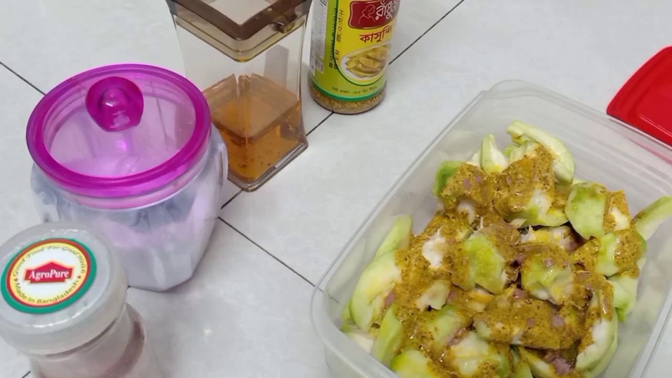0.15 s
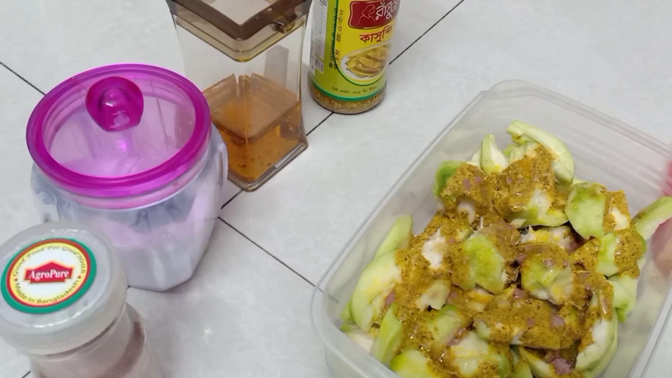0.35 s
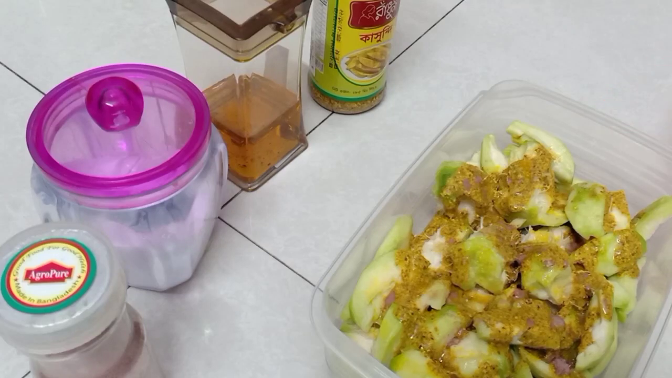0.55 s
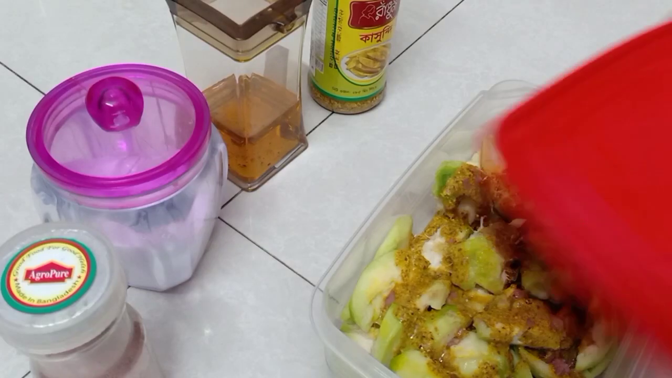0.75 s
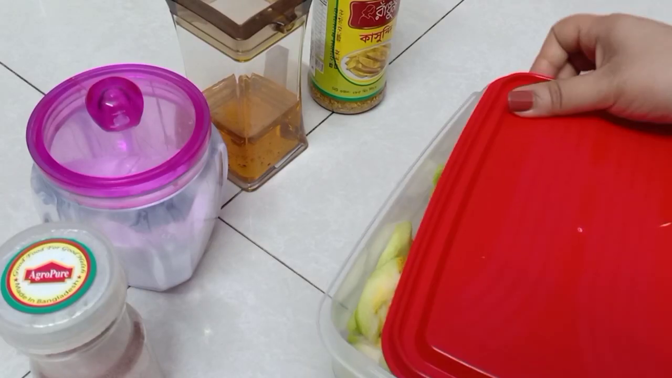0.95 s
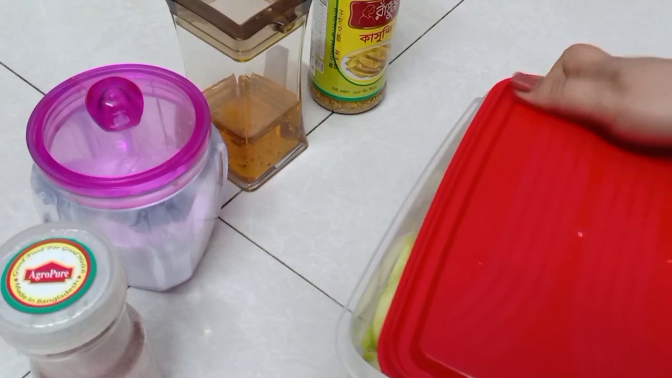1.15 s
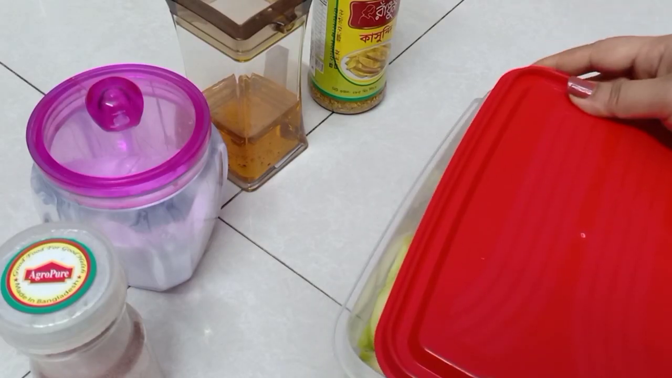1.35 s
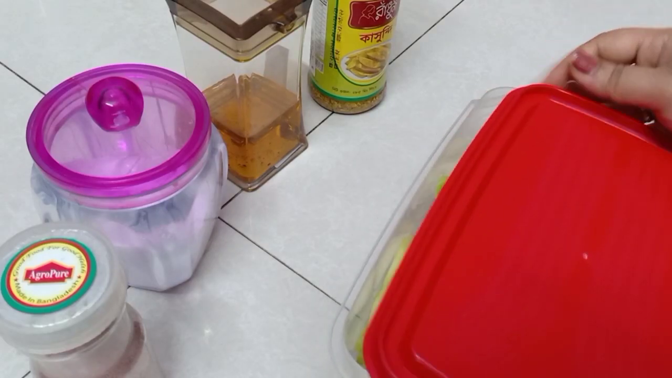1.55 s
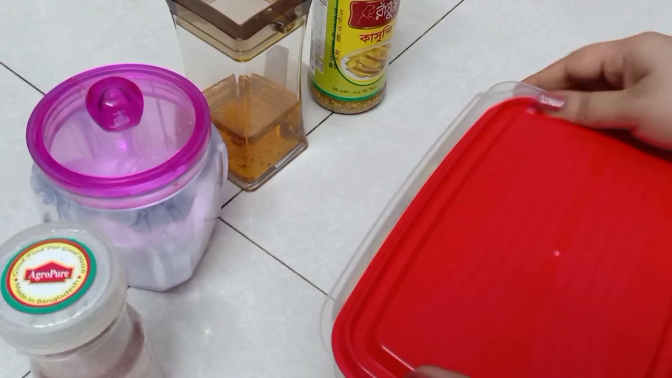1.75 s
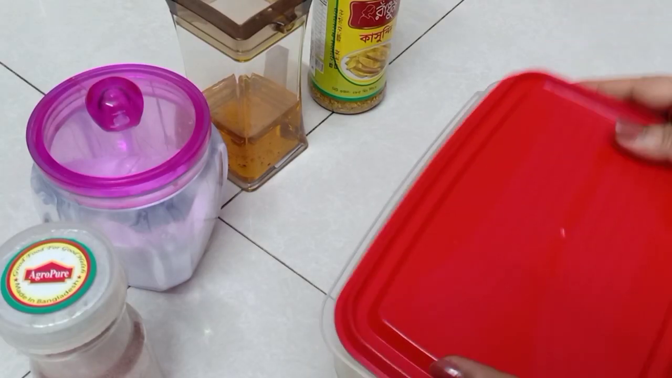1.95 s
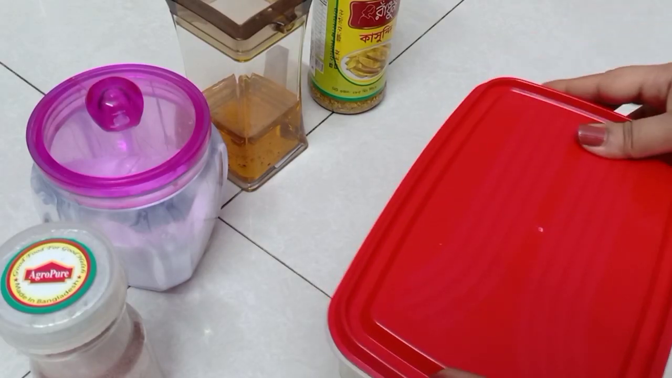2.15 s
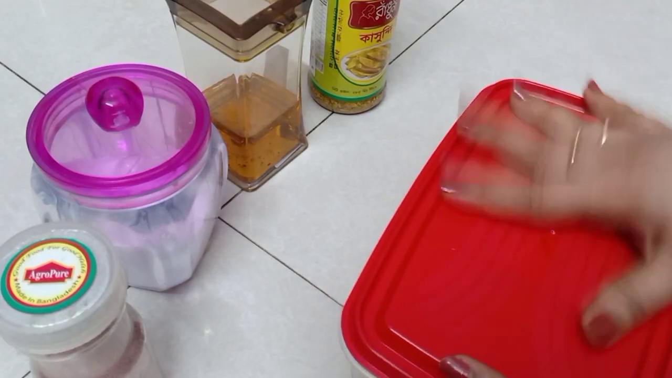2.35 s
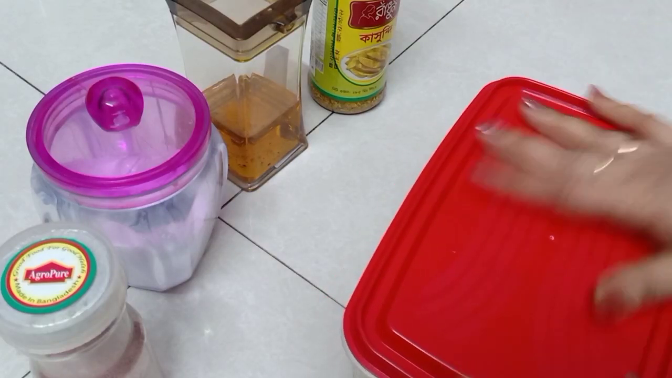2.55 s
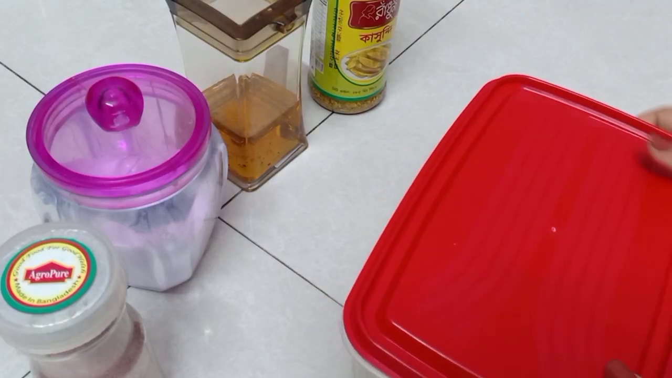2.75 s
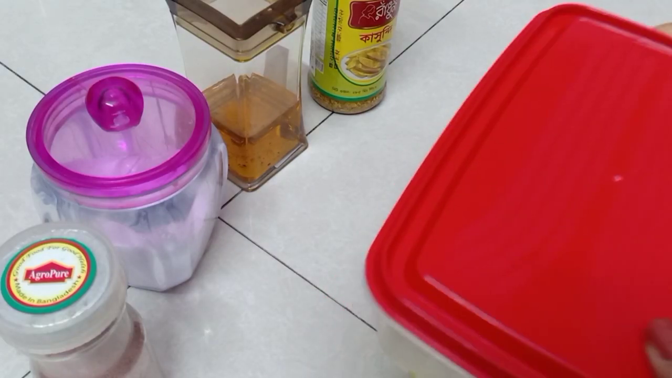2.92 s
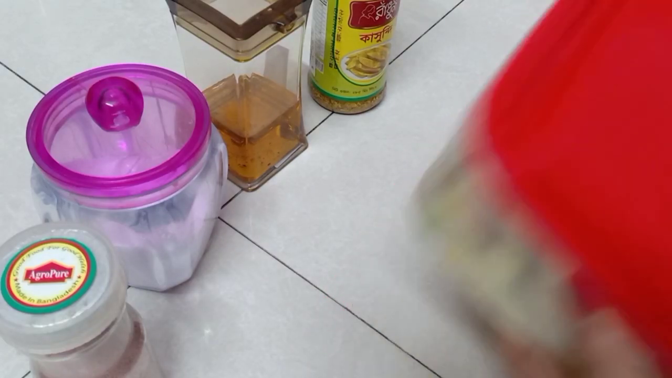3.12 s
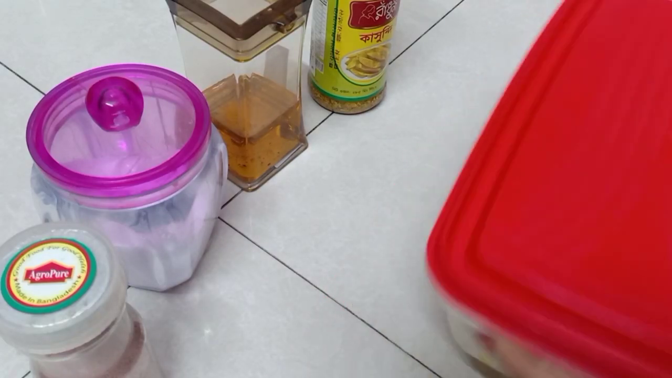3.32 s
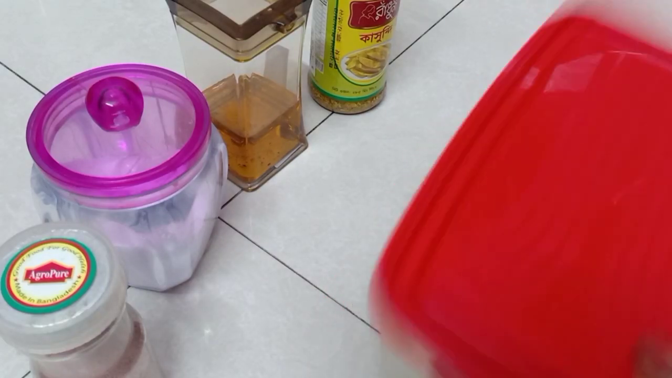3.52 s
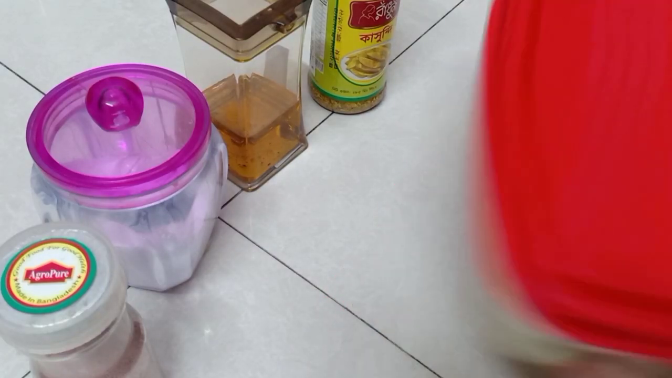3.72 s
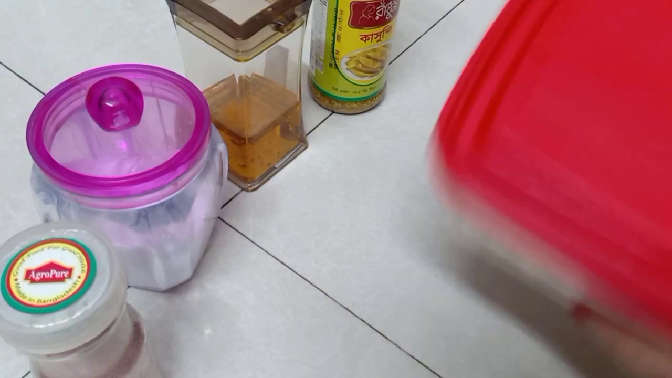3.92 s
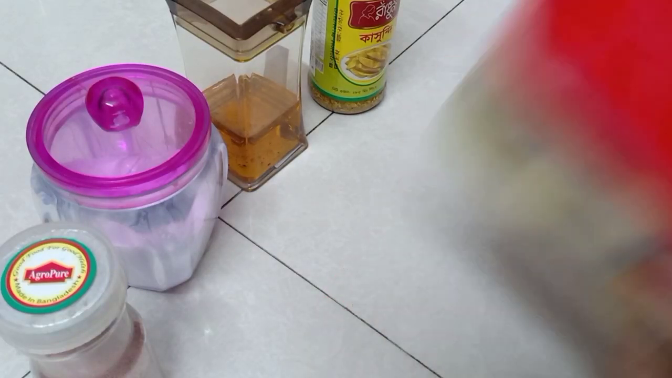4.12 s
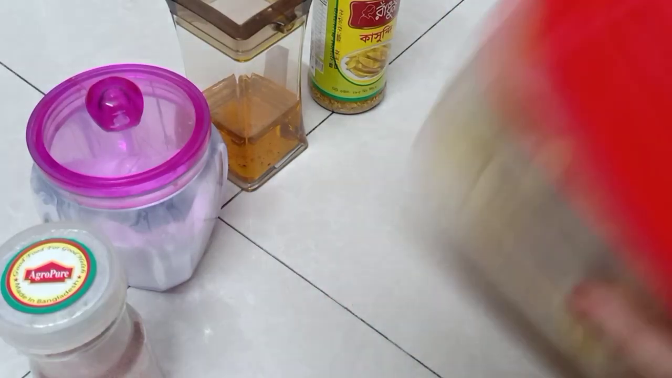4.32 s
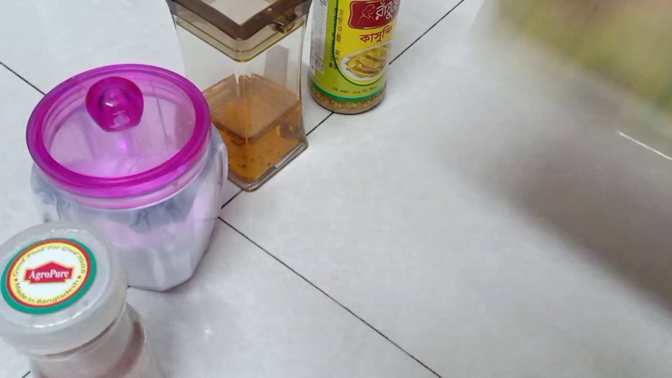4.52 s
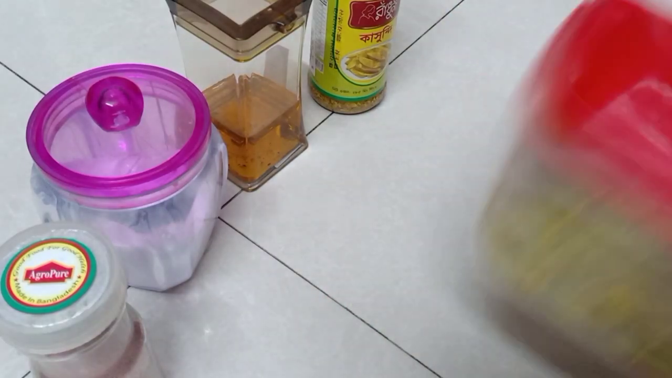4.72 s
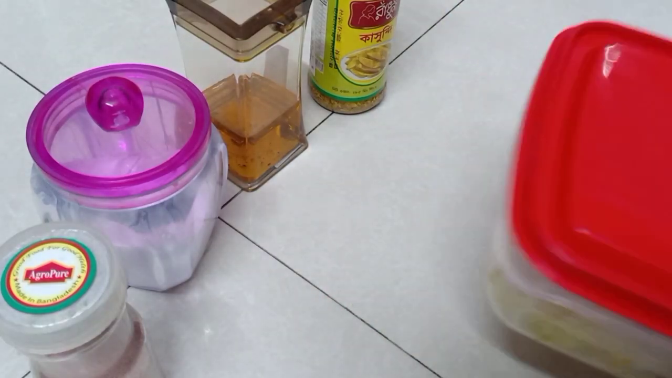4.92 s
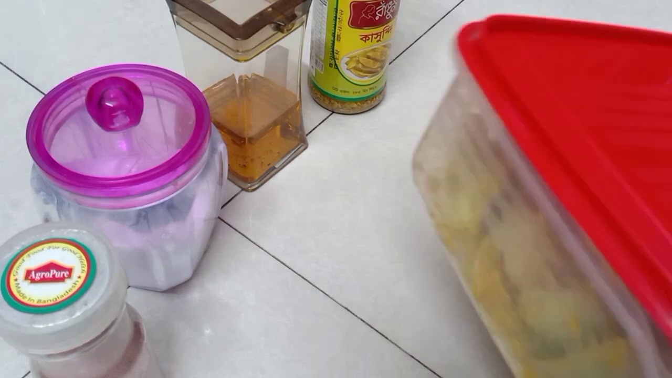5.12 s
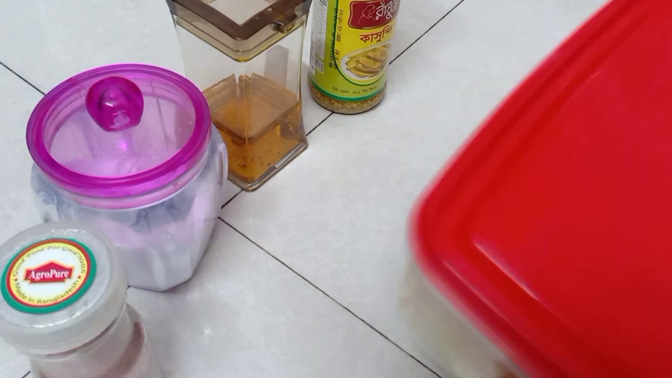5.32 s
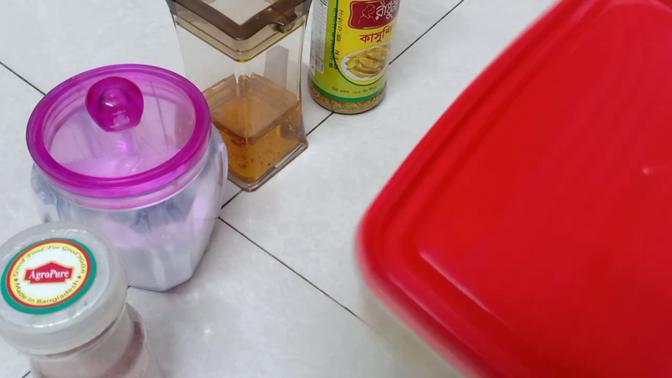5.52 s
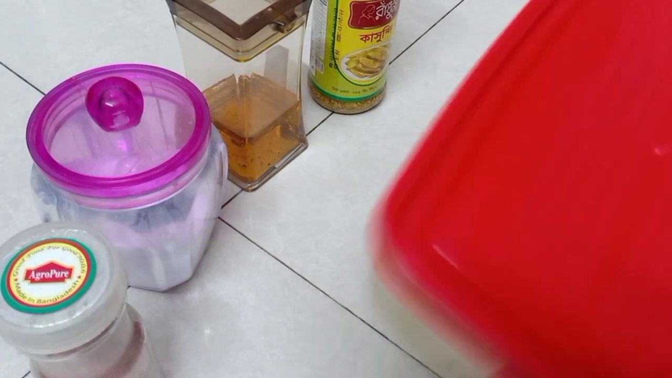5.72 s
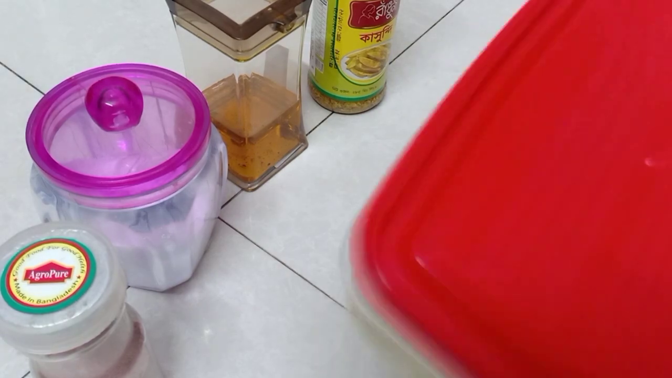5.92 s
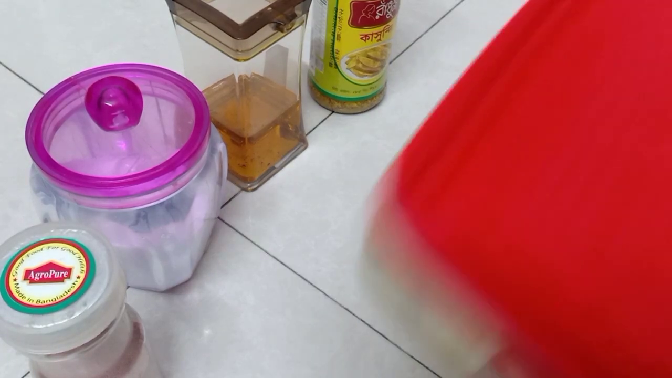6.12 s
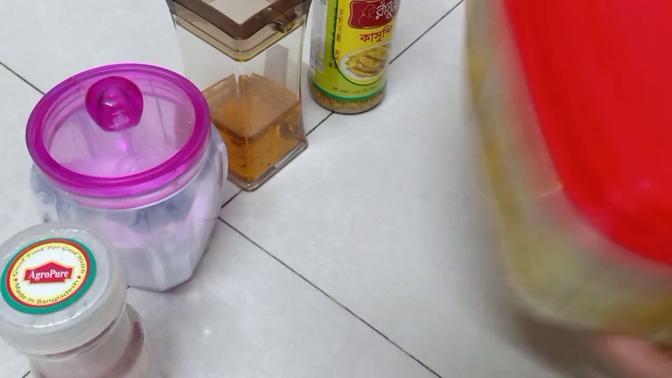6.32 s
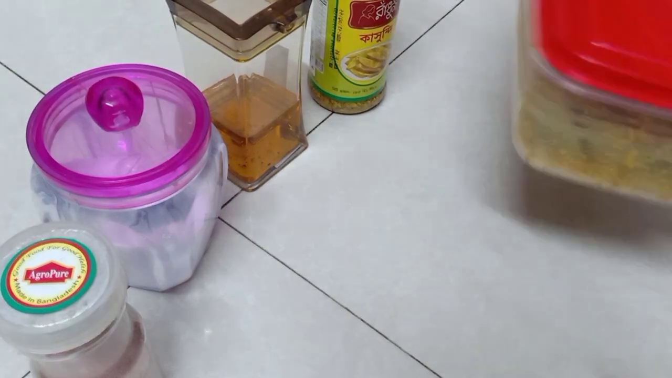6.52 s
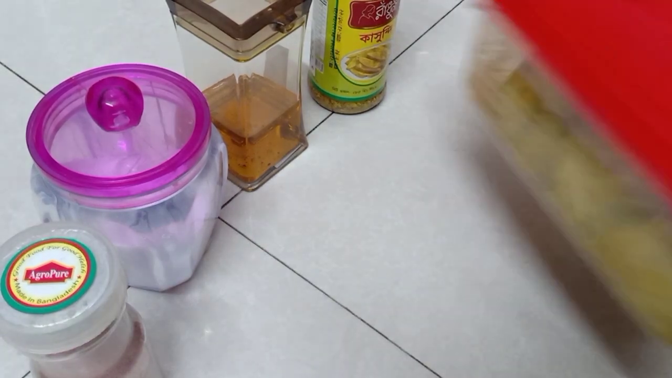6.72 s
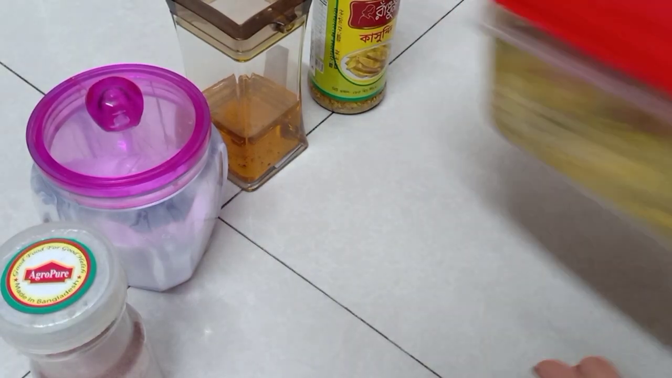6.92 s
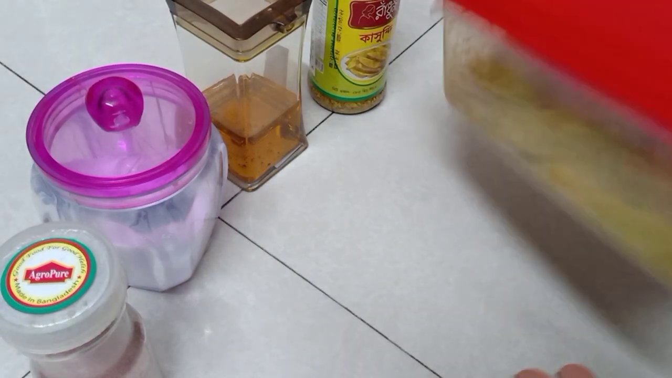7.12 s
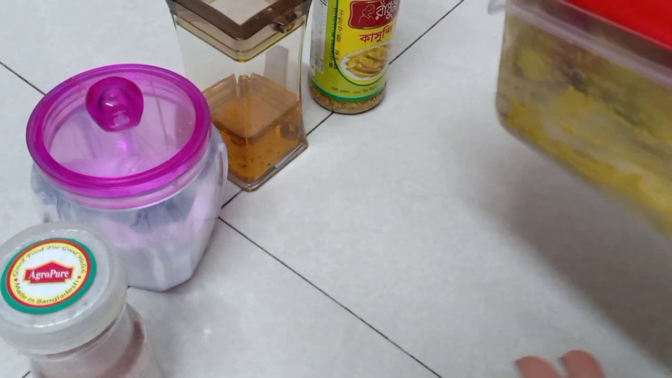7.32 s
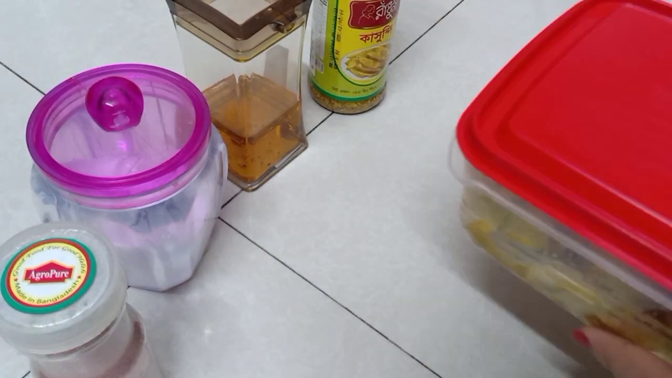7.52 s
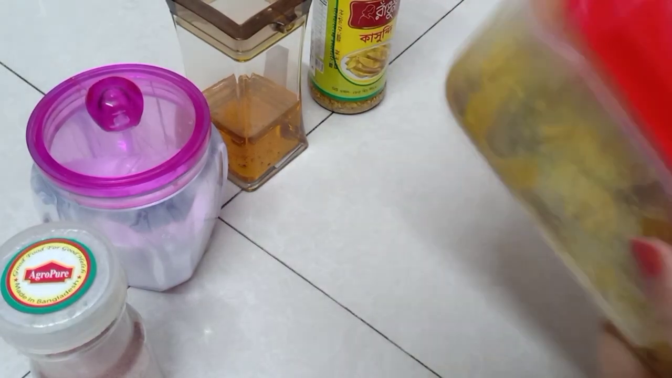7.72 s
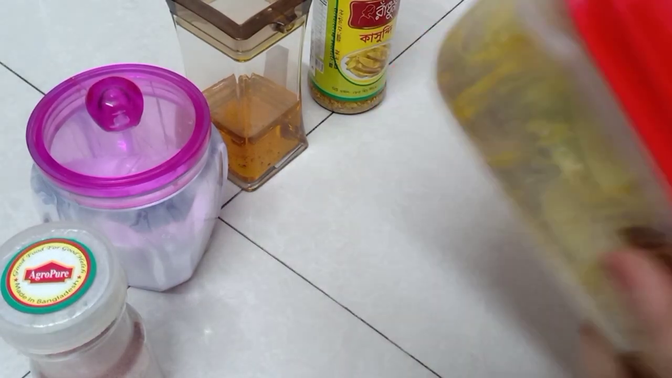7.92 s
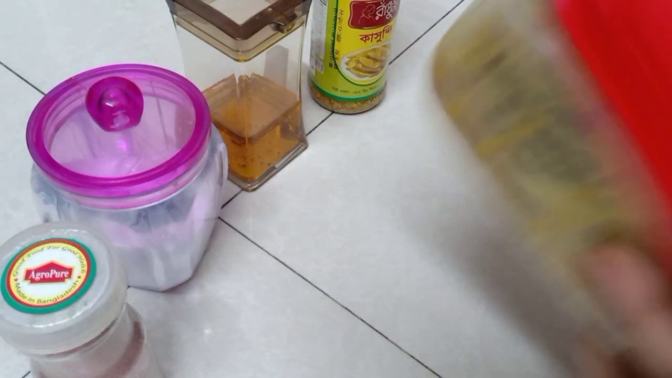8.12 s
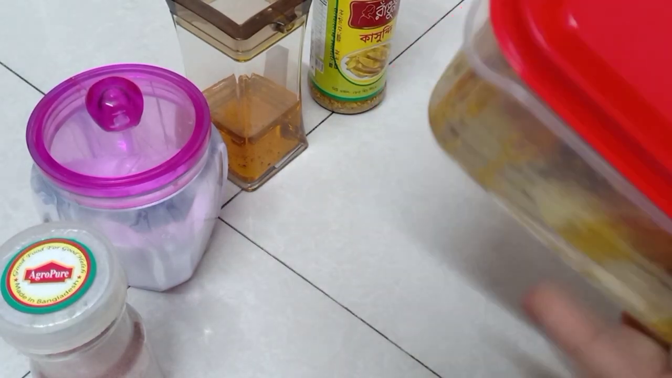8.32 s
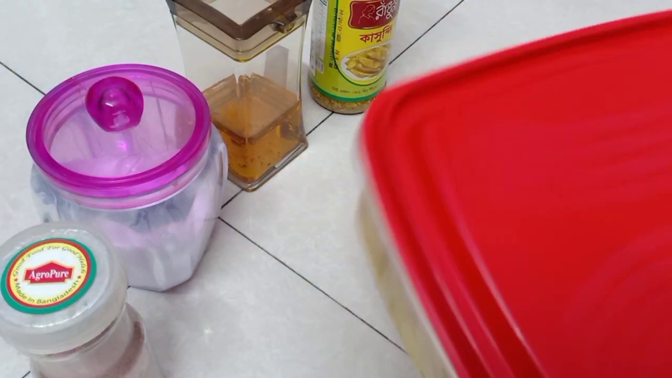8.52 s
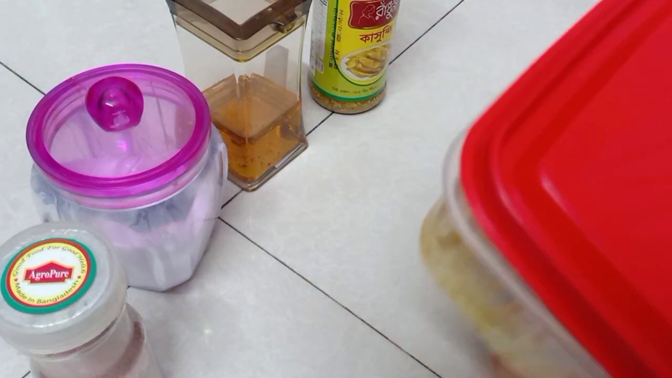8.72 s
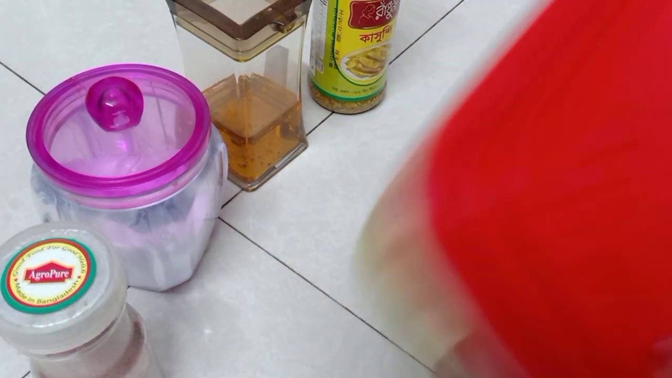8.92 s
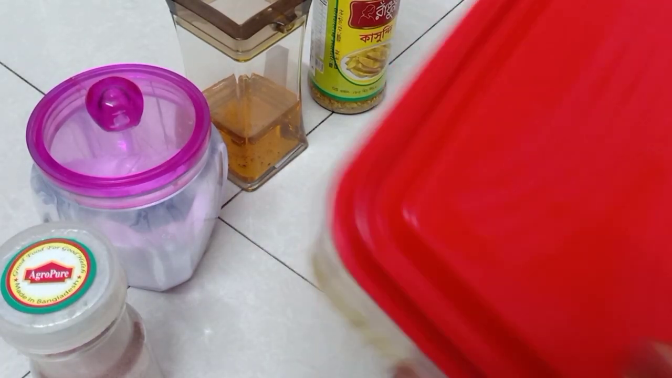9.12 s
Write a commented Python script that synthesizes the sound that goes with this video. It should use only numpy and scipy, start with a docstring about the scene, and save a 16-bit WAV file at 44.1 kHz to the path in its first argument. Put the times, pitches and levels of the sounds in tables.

```python
"""Cut fruit in a lidded plastic box is shaken in bouts: each landing is a quick cluster of wet blows on a wall,
with stragglers in longer pauses. Noisy contact bursts excite resonances in four registers; single bursts clack.
First the lid taps and squeaks on a tiled counter and on the rim; short clicks ring. Slides are grainy noise.
Decaying noise gives the small kitchen's tail, over a faint steady hush."""
import sys
import numpy as np
from scipy import signal
from scipy.fft import rfft, irfft, next_fast_len
from scipy.io import wavfile
from scipy.ndimage import map_coordinates

SR = 44100
rng = np.random.default_rng(int(sys.argv[2]) if len(sys.argv) > 2 else 0)


def output_pcm(signal):
    """Save a mono or channel-first signal as 16-bit PCM at the path in sys.argv[1].

    Samples are clipped to [-1, 1] before scaling.
    """
    pcm = np.clip(np.atleast_2d(signal).T, -1, 1) * 32767
    wavfile.write(sys.argv[1], SR, np.round(pcm).astype(np.int16))


N = 408366
RING_SAMPLES = 6144
LOAD_DETUNE = 0.041  # share by which the heap detunes the wall


def amp(db):
    """dB to amplitude."""
    return 10 ** (np.asarray(db) / 20)


def unit(x):
    """Scale to an RMS of one."""
    return x / np.sqrt(np.mean(x ** 2) + 1e-20)


def along(points, hz):
    """Interpolate (frequency [Hz], value) points on a log frequency axis."""
    point_hz, value = np.transpose(points)
    return np.interp(np.log(hz + 1), np.log(point_hz + 1), value)


def filtered(x, response):
    """Multiply the spectrum of x by a response of frequency."""
    size = next_fast_len(N + 8192)
    hz = np.fft.rfftfreq(size, 1 / SR)
    return irfft(rfft(x, size) * response(hz), size)[..., :N]


def wobble(rate_hz):
    """Smooth random curve with rate_hz knots a second."""
    knots = rng.standard_normal(int(N * rate_hz / SR) + 4)
    return map_coordinates(knots, [np.arange(N) * rate_hz / SR])


def add(track, start_s, sound):
    """Mix a sound into a track at start_s."""
    part = track[:, max(round(start_s * SR), 0):][:, :sound.shape[1]]
    part += sound[:, :part.shape[1]]


# near reflections: (frequency [Hz], amplitude over direct sound [ratio])
SCATTER = [(100, 0.066), (400, 0.42), (1000, 1.02), (2500, 2.14), (6000, 1.66)]


def paths(lead_s=0.00012, swing_s=0.00006):
    """Box to both microphones: the left hears it first; box walls and tiles scatter it."""
    hz, t = np.fft.rfftfreq(RING_SAMPLES, 1 / SR), np.arange(RING_SAMPLES) / SR
    delay_s = np.array([[0], [abs(rng.normal(lead_s, swing_s))]])
    direct = np.exp(-2j * np.pi * hz * delay_s)
    decay = amp(-60 * t / 0.008)
    near = unit(rng.standard_normal((2, RING_SAMPLES)) * decay) / np.sqrt(RING_SAMPLES)
    return direct + along(SCATTER, hz) * rfft(near)


# thump, knock, slap, snap: (low edge [Hz], high edge [Hz])
REGISTERS = [(100, 560), (490, 1400), (1300, 3400), (3500, 19000)]


def register_modes(table, detune=0):
    """Causal resonance responses by register, each randomly detuned by about the share detune."""
    f = np.fft.rfftfreq(RING_SAMPLES, 1 / SR)
    tuned = [(hz, hz * np.exp(detune * rng.standard_normal()), width, db) for hz, width, db in table]
    groups = []
    for low, high in REGISTERS:
        sos = signal.butter(3, [low, high], "band", fs=SR, output="sos")
        band = signal.sosfreqz(sos, f, fs=SR)[1]
        modes = [amp(db) * centre * width / (centre * centre - f * f + 1j * f * width)
                 for hz, centre, width, db in tuned if low <= hz < high]
        groups.append(band * np.array(modes))
    return groups


def cluster(modes, length_s, levels_db, crest, fall_db, count, uneven_db=2.5):
    """Uneven contacts swell to the share crest of length_s, then fall; each drives the modes differently."""
    share = (np.arange(count) + rng.random(count)) / count
    at = np.clip((share - share[0]) * length_s * SR, 0, RING_SAMPLES // 2).astype(int)
    envelope_db = -fall_db * np.maximum(share - crest, 2 * (crest - share))
    size_db = uneven_db * rng.standard_normal(count) + envelope_db
    to_ears, sound = paths(), 0
    for register, (group, db) in enumerate(zip(modes, levels_db)):
        force = np.zeros((len(group), RING_SAMPLES))
        hardness = 1 + 0.012 * register  # higher registers favour the hard contacts
        force[:, at] = amp(hardness * size_db) * rng.standard_normal((len(group), count))
        force /= np.linalg.norm(force, axis=1, keepdims=True)
        ring = irfft((rfft(force) * group).sum(0) * to_ears)
        energy = 0.5 * np.mean(ring ** 2) + np.mean(ring.mean(0) ** 2)  # sides and centre
        sound = sound + amp(db) * ring * np.sqrt(0.01 * SR / RING_SAMPLES / energy)
    return sound


# box resonances, from air and floor up to the stiff rim: (frequency [Hz], width [Hz], level [dB])
BOX = [(167.2, 22.5, -0.5), (203.5, 44, 2.5), (331.4, 82, 3), (398, 76, 1.5), (443.3, 84, 6.5),
       (609, 45, -5), (744, 63, -1.5), (835, 150, -4.5), (985, 106, -10), (1110, 530, -17),
       (1530, 620, -19.5), (1900, 560, -18), (2440, 540, -19.5), (3880, 600, -28.5), (5030, 690, -24),
       (5850, 350, -26.5), (14500, 1100, -52.5)]
# fruit hits a wall: (time [s], clatter length [s], strength [dB], wetness [dB])
LANDINGS = [(2.944, 0.038, -10, -2), (3.102, 0.026, -7, -12), (3.327, 0.025, -12, 0.5),
            (3.362, 0.013, -17, -8), (3.428, 0.022, -9, -7.5), (3.45, 0.017, -18, 1),
            (3.519, 0.018, -9, -0.5), (3.677, 0.012, -24, 1.5), (3.87, 0.015, -25.5, 4.5),
            (3.982, 0.052, -15, -3.5), (4.106, 0.01297, -6.5, -14.5), (4.154, 0.024, -22, -8),
            (4.236, 0.019, -11, -4), (4.286, 0.019, -22, -10), (4.493, 0.013, -13.5, -13),
            (4.53, 0.031, -19, 5), (4.631, 0.019, -11.5, -14), (4.651, 0.023, -17.5, 7),
            (4.678, 0.018, -22, -6.5), (4.772, 0.022, -13.5, -1), (4.797, 0.022, -21.5, 0.5),
            (4.893, 0.01, -26.5, 1.5), (5.216, 0.028, -14.5, -16), (5.261, 0.026, -23, -13),
            (5.326, 0.024, -16, -3), (5.427, 0.0082, -12.5, -0.5), (5.515, 0.02, -12, 0),
            (5.614, 0.018, -13.5, 3.5), (5.707, 0.015, -14, 4.5), (5.798, 0.019, -16, 7),
            (5.914, 0.011, -14.5, 5), (6.005, 0.012, -13, 0.5), (6.098, 0.025, -13, 2),
            (6.522, 0.016, -14.5, -4.5), (6.656, 0.019, -20, -1), (6.699, 0.028, -16.5, 3),
            (6.769, 0.038, -19, -8.5), (6.829, 0.023, -16, -2.5), (6.907, 0.028, -20, -3),
            (6.956, 0.024, -16.5, -11), (7.029, 0.0109, -14, 3.5), (7.08, 0.019, -16.5, -5.5),
            (7.156, 0.033, -18.5, -0.5), (7.21, 0.023, -18, 2.5), (7.277, 0.046, -15.5, -28),
            (7.346, 0.028, -18, -14.5), (7.54, 0.0079, -17, -15), (7.592, 0.0026, -26, -20),
            (7.634, 0.021, -15, -8), (7.753, 0.0093, -15, 1), (7.849, 0.017, -13, -5),
            (7.951, 0.018, -14.5, -3), (8.05, 0.013, -12, 2), (8.155, 0.023, -19.5, -7),
            (8.202, 0.011, -31.5, -7), (8.723, 0.043, -14, -5), (8.838, 0.018, -13, -1),
            (8.94, 0.011, -13, 3), (9.042, 0.022, -16.5, 1.5), (9.159, 0.019, -11, -0.5)]
# rows thump, knock, slap, snap:
# (level re strength [dB], change per dB over USUAL_DB [dB/dB], change per dB of wetness [dB/dB])
LANDING_COLOUR = [(-2, -0.12, 0.1345), (-3, 0.0039, 0.17), (-13, -0.39, 0.36), (-25, -1.13, 1)]
# hold of the box per bout, softer or stiffer wall: (from time [s], thump [dB], knock [dB], slap [dB])
GRIPS = [(2.8, -4, -4, -1), (3.4, -1.5, -2, 1.5), (3.92, -0.5, -1.5, -1), (5.1, 2.5, 2, -1),
         (6.3, 1, -2.5, -2), (7.45, 2.5, 3, 0), (8.6, 3, 2.5, 1)]
# straggler levels re landing: (thump [dB], knock [dB], slap [dB], snap [dB])
STRAGGLE_DB = [-12, -20, -16.5, -15.5]
USUAL_DB = -15.5
SWELL_S = 0.068  # longer landings peak later, halfway at most
STRAGGLE_AFTER_S, STRAGGLE_LENGTH_S, STRAGGLE_PAUSE_S = 0.03, 0.04, 0.084


def fruit():
    """The heap slams a wall it detunes; stragglers follow in longer pauses."""
    track = np.zeros((2, N))
    base_db, by_strength, by_wetness = np.transpose(LANDING_COLOUR)
    pauses_s = np.diff([row[0] for row in LANDINGS], append=N / SR)
    for (s, length_s, db, wet_db), pause_s in zip(LANDINGS, pauses_s):
        loaded = register_modes(BOX, LOAD_DETUNE)
        wall_db = [(*colour, 0) for start_s, *colour in GRIPS if start_s < s][-1]
        levels_db = db + base_db + by_strength * (db - USUAL_DB) + by_wetness * wet_db + wall_db
        crest = min(length_s / SWELL_S, 0.5)
        add(track, s, cluster(loaded, length_s, levels_db, crest, fall_db=12.5, count=28))
        if pause_s > STRAGGLE_PAUSE_S:
            straggle_db = levels_db + np.array(STRAGGLE_DB) + rng.normal()
            stragglers = cluster(loaded, STRAGGLE_LENGTH_S, straggle_db, crest=0.54, fall_db=51,
                                 count=12, uneven_db=6.0)
            add(track, s + STRAGGLE_AFTER_S, stragglers)
    return track


# firm piece or lid edge on plastic: (time [s], knock [dB], slap [dB], snap [dB])
CLACKS = [(0.8145, -28, -27, -37), (2.958, -16, -47, -50), (3.1163, -23.5, -26, -39.5),
          (3.3378, -19.5, -20, -37), (3.35, -18.5, -32, -49), (3.531, -22.5, -28, -38),
          (4.1662, -26.5, -24, -48), (4.528, -16, -26, -25.5), (5.8068, -19, -30, -25.5),
          (6.8345, -24.5, -30.5, -45), (6.9653, -22, -35, -43.5), (7.0289, -19.5, -33, -41.5),
          (7.084, -21.5, -39, -50), (7.2209, -22.5, -30.5, -41), (8.7407, -19, -32, -44)]
# struck patch of wall, strongly damped: (frequency [Hz], width [Hz], level [dB])
PATCH = [(446, 86, -2), (867, 660, 0), (2090, 650, 0), (4900, 520, 0)]
CLACK_THUMP_DB = -18.5  # re knock


def clacks():
    """Single hard contacts, each ringing a differently loaded patch of wall."""
    track = np.zeros((2, N))
    for s, knock_db, slap_db, snap_db in CLACKS:
        patch = register_modes(PATCH, 2 * LOAD_DETUNE)
        levels_db = [knock_db + CLACK_THUMP_DB, knock_db, slap_db, snap_db]
        add(track, s, cluster(patch, 0, levels_db, crest=0, fall_db=0, count=1))
    return track


# soft low thuds: (time [s], length [s], strength [dB])
THUDS = [(3.838, 0.023, -26), (3.962, 0.0038, -20.5), (4.419, 0.018, -22.5), (6.447, 0.045, -24.5),
         (9.088, 0.014, -22)]
# thud levels re strength: (thump [dB], knock [dB], slap [dB], snap [dB])
THUD_DB = [2.5, -9, -16.5, -24.5]


def thuds(modes):
    """Soft low thuds with little knock: contact clusters weighted to the lowest box modes."""
    track = np.zeros((2, N))
    for s, length_s, db in THUDS:
        levels_db = db + np.array(THUD_DB)
        add(track, s, cluster(modes, length_s, levels_db, crest=0.47, fall_db=26, count=14))
    return track


# lid taps and catches, on counter then rim: (time [s], strength [dB], sharpness [dB], hand's thump re strength [dB])
LID = [(0.159, -22.5, -8.5, -29), (0.303, -29, -6.5, -11), (0.39, -27.5, -5.5, -17),
       (0.73, -31.5, -6.5, -5), (0.816, -31.5, -8.5, -7), (0.858, -34.5, -15, -3), (0.961, -37, -12.5, -8),
       (1.054, -35.5, -12, -21), (1.084, -37, -13.5, -7.5), (1.107, -34, -15.5, -22),
       (1.277, -37.5, -5.5, -14), (1.364, -26.5, -21, -23), (1.427, -29.5, -16.5, -28),
       (1.498, -39.5, -12.5, -21), (1.547, -38, -17, -4.5), (2.02, -35, -11, 2), (2.047, -30, -12.5, -4.5),
       (2.073, -36.5, -12.5, 1.5), (2.281, -41, -4.5, 1.5), (2.379, -34, -8, 8), (2.484, -37, -12, -1.5),
       (3.735, -29.5, -18, -19), (8.377, -38, -9.5, 5)]
# rows knock, slap, snap: (level re strength [dB], change per dB of sharpness [dB/dB])
TAP_COLOUR = [(-5.5, -0.15), (-0.5, 0.54), (2.5, 1.4)]
# loose lid resonances: (frequency [Hz], width [Hz], level [dB])
LOOSE_LID = [(378, 190, -12), (805, 47, 0), (1170, 420, 6.5), (2610, 2200, -3), (2550, 460, 21),
             (5400, 1300, 10), (14600, 690, -52)]
# taps ring the box modes between: (start time [s], end time [s]); otherwise the loose lid's
SEATING = (.6, 4)


def lid(box_modes, length_s=0.011):
    """A tap and short chatter of the lid's edge; the lighter the touch, the longer it drags."""
    track, loose = np.zeros((2, N)), register_modes(LOOSE_LID)
    base_db, by_sharpness = np.transpose(TAP_COLOUR)
    for s, db, sharp_db, thump_db in LID:
        levels_db = db + np.append(thump_db, base_db + by_sharpness * sharp_db)
        drag = amp(-0.45 * (db + 30))
        modes = box_modes if SEATING[0] < s < SEATING[1] else loose
        add(track, s, cluster(modes, length_s * drag, levels_db, crest=0, fall_db=10.5, count=10))
    return track


# short single clicks with a pitched ring: (time [s], ring pitch [Hz], ring [dB], snap [dB])
CLICKS = [(0.158, 1110, -25.5, -32.5), (2.761, 610, -32.5, -41), (6.276, 900, -46, -45.5),
          (7.5, 524, -29.5, -34.5), (8.5227, 990, -25.5, -35.5)]


def clicks(width_hz=130, snap_hz=4900, snap_width_hz=2200, slap_re_snap_db=-5):
    """One impulse excites a broad snap and a pitched resonance that rings for a few cycles."""
    track = np.zeros((2, N))
    low, _, high, _ = PATCH
    for s, hz, ring_db, snap_db in CLICKS:
        modes = register_modes([low, (hz, width_hz, 0), high, (snap_hz, snap_width_hz, 0)])
        levels_db = [ring_db + CLACK_THUMP_DB, ring_db, snap_db + slap_re_snap_db, snap_db]
        add(track, s, cluster(modes, 0, levels_db, crest=0, fall_db=0, count=1))
    return track


# lid edge on tiles, later thinly on the rim:
# (time [s], length [s], pitch [Hz], level [dB], strongest harmonic [number])
SQUEAKS = [(0.266, 0.02, 1172, -34, 1), (3.609, 0.07, 955, -45.5, 6)]


def squeak(rolloff_db=19, sag=0.02, rough_db=4):
    """Stick-slip of plastic: a rough tone starts quickly, then sags and fades as the slip slows."""
    t, sound = np.arange(N) / SR, 0
    waver, rough = 1 + 0.005 * wobble(500), amp(rough_db * wobble(900))
    for s, length_s, hz, db, strongest in SQUEAKS:
        u = np.clip((t - s) / length_s, 0, 1)
        phase = 2 * np.pi * np.cumsum(hz * waver * (1 + sag * (0.5 - u))) / SR
        tone = 0
        for k in range(1, 14):
            loss_db = rolloff_db * np.sqrt(abs(np.log2(k / strongest))) + rolloff_db * (k < strongest - 1)
            tone = tone + amp(-loss_db) * np.sin(k * phase)
        sound = sound + amp(db) * np.sin(np.pi * np.sqrt(u)) ** 2 * tone
    return rough * sound


HISS_DB, STIR_DB, STIR_DECAY_S = -59.5, -29.5, 0.032  # STIR_DB re landing strength


def hiss_and_stir_db():
    """Level of a constant faint hiss plus a decaying stir after each landing."""
    kicks = np.zeros(N)
    for s, _, db, _ in LANDINGS:
        kicks[round(s * SR)] = amp(db + STIR_DB) ** 2
    stir = signal.lfilter([1], [1, -np.exp(-2 / (STIR_DECAY_S * SR))], kicks)
    return 10 * np.log10(amp(HISS_DB) ** 2 + stir)


HANDLED_S = 0.72  # hands reach the box


def settling(modes, level_db, count=110):
    """While the box is handled, pieces shift and brush its walls, louder just after landings."""
    track = np.zeros((2, N))
    share = (np.arange(count) + rng.random(count)) / count
    for s in HANDLED_S + (N / SR - HANDLED_S) * share:
        db = level_db[min(int(s * SR), N - 1)] + rng.normal()
        levels_db = db + np.array([12.5, 13.5, 8.0, -4.5])
        add(track, s, cluster(modes, 0.046, levels_db, crest=0.98, fall_db=3.0, count=20))
    return track


# lid over counter and rim, then fruit along a wall: (time [s], length [s], level [dB])
SLIDES = [(0.166, 0.18, -43), (0.336, 0.11, -48), (0.817, 0.11, -51.5), (1.028, 0.74, -59.5),
          (1.874, 0.33, -57.5), (2.384, 0.15, -56.5), (3.675, 0.031, -39.5), (3.887, 0.03, -36),
          (8.702, .53, -47.5)]
# sliding spectrum: (frequency [Hz], level per Hz [dB])
SCRAPE = [(250, -33), (500, -7), (1100, 2.5), (2300, -0.5), (3500, -6.5), (5700, -2), (8500, -23.5),
          (15000, -28)]
SLIDE_ATTACK_S, SLIDE_RELEASE_S = 0.004, 0.0042


def slide(level_db, grain_db=4, catch_db=2.5):
    """Noise of fluctuating level: slides start and stop quickly over the constant hiss and the stirs."""
    t, power = np.arange(N) / SR, amp(level_db) ** 2
    for s, length_s, db in SLIDES:
        attack = np.clip((t - s) / SLIDE_ATTACK_S, 0, 1)
        release = np.exp(-np.maximum(t - s - length_s, 0) / SLIDE_RELEASE_S)
        power = power + (amp(db) * attack * release) ** 2
    grains = rng.standard_normal((2, N)) * amp(grain_db * wobble(400) + catch_db * wobble(30))
    return np.sqrt(power) * unit(filtered(grains, lambda hz: amp(along(SCRAPE, hz))))


# lift of the top band over time, crisper or duller: (time [s], lift [dB])
TOP_LIFT = [(.9, 5), (1.4, 14.5), (5.5, 10.5), (7.1, 19.5), (9, 13.5)]


def radiated(x, dip=0.35, dip_hz=9400, dip_width_hz=1900, top_hz=11500.0):
    """Plastic radiates little between its two top rings; the top band is lifted by an amount that varies."""
    x = filtered(x, lambda hz: 1 - dip * np.exp(-((hz - dip_hz) / dip_width_hz) ** 2))
    top = filtered(x, lambda hz: hz ** 8 / (hz ** 8 + top_hz ** 8))
    lift_db = np.interp(np.arange(N) / SR, *np.transpose(TOP_LIFT))
    return x + top * (amp(lift_db) - 1)


# room decay: (frequency [Hz], T60 [s])
KITCHEN = [(150, 0.42), (800, 0.16), (5000, 0.18), (14000, 0.073)]


def kitchen(x):
    """Room tail of decaying noise, redrawn every seventh of a second."""
    wet, step = np.zeros((2, N)), SR // 7
    for start in range(0, N, step):
        hz, t, z = signal.stft(rng.standard_normal((2, SR // 2)), SR, nperseg=256)
        decay = amp(-60 * t / along(KITCHEN, hz)[:, None])
        tail = signal.istft(z * decay, SR, nperseg=256)[1]
        tail = tail + 0.5 * tail[::-1]  # microphones close together
        tail = tail / np.linalg.norm(tail[0])
        add(wet, start / SR + 0.009, signal.fftconvolve(x[None, start:start + step], tail, axes=1))
    return wet


# room noise spectrum: (frequency [Hz], level per Hz [dB])
HUSH = [(60, 0), (160, 9), (300, 2.5), (800, 2.5), (1250, -16.5), (2500, -8), (3600, -18), (6500, -40),
        (15000, -26.5)]


def hush(level_db=-53, apart_hz=900):
    """Steady room noise, nearly alike on both sides in the bass."""
    mid, side = filtered(rng.standard_normal((2, N)), lambda hz: amp(along(HUSH, hz)))
    side = filtered(side, lambda hz: 0.11 + hz / (hz + apart_hz))
    return amp(level_db) * unit(np.array([mid + side, mid - side]))


def scene():
    """Blows lean left; lid, settling, clicks, slides and squeaks join them in the kitchen, over the hush."""
    modes, level_db = register_modes(BOX), hiss_and_stir_db()
    blows = radiated(fruit() + thuds(modes) + clacks()) * amp([[1.2], [-1.5]])  # left, right [dB]
    handling = radiated(lid(modes) + settling(modes, level_db))
    box = blows + handling + clicks() + slide(level_db) + squeak()
    return box + amp(-14.0) * kitchen(box.mean(0)) + hush()


TOP_HZ = 15900


def record(dry):
    """Round off the highest peaks, then cut steeply above TOP_HZ."""
    held = dry / (1 + np.abs(dry / 0.95) ** 6) ** (1 / 6)
    return filtered(held, lambda hz: 1 / np.sqrt(1 + (hz / TOP_HZ) ** 160))


dry = scene()
out = record(dry)
output_pcm(out)
```